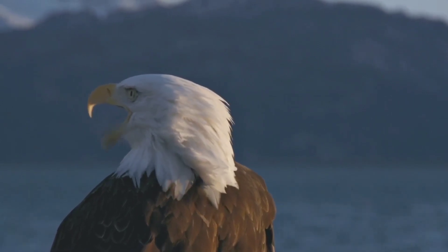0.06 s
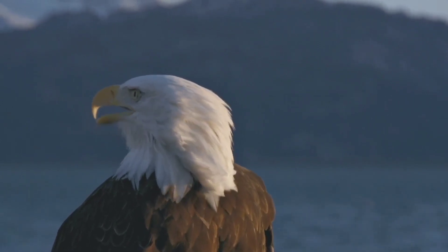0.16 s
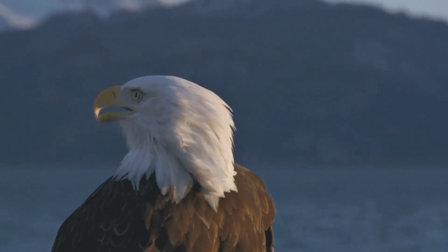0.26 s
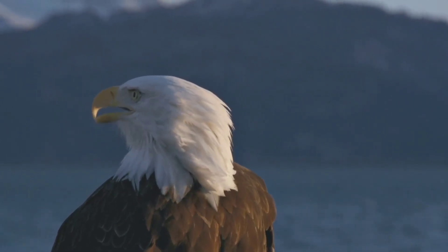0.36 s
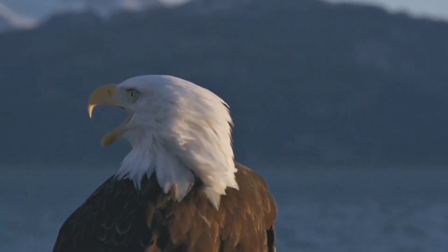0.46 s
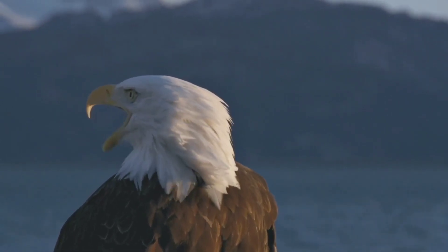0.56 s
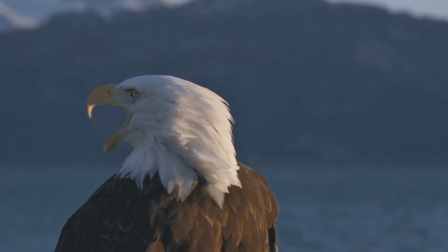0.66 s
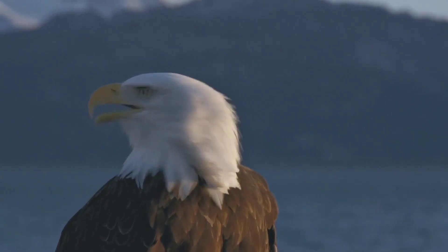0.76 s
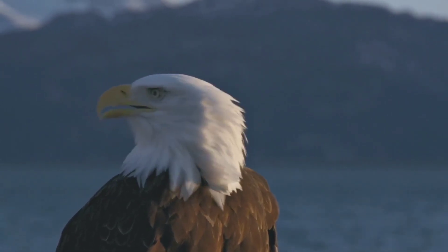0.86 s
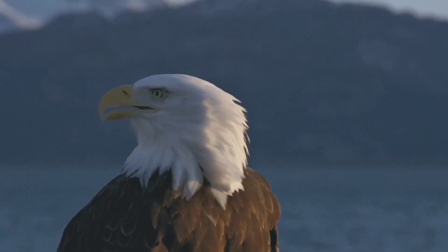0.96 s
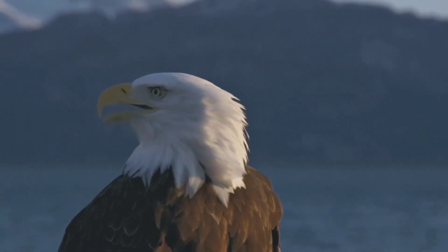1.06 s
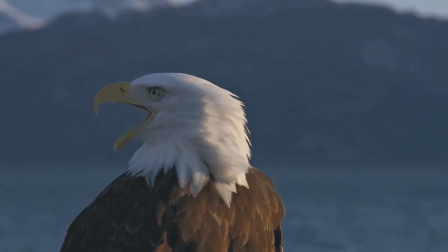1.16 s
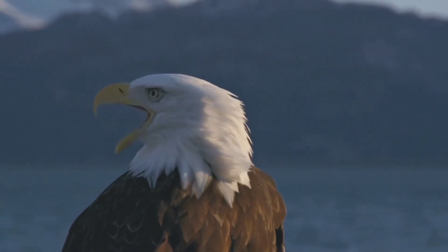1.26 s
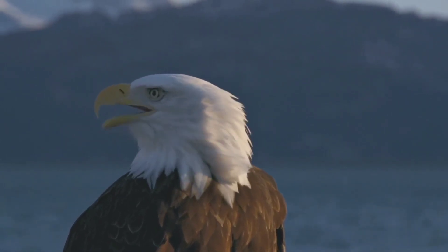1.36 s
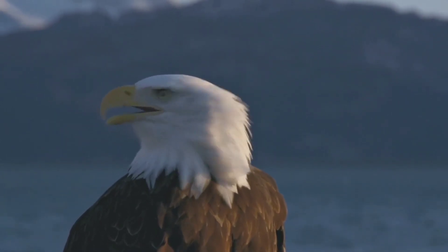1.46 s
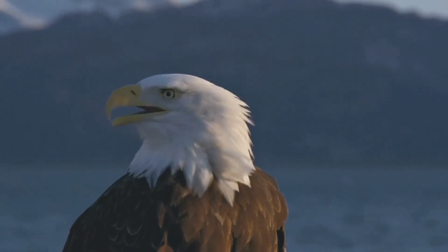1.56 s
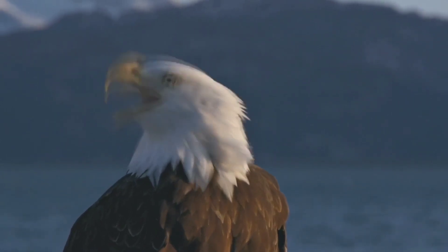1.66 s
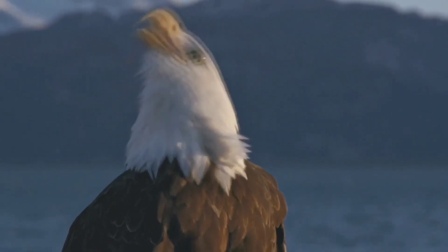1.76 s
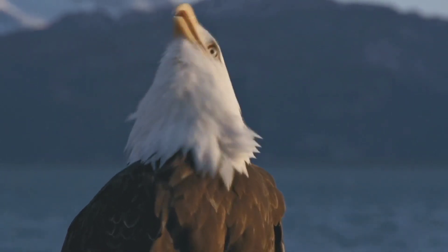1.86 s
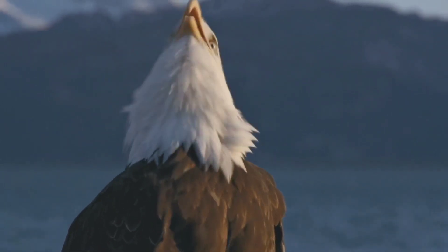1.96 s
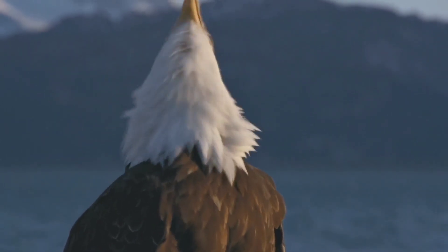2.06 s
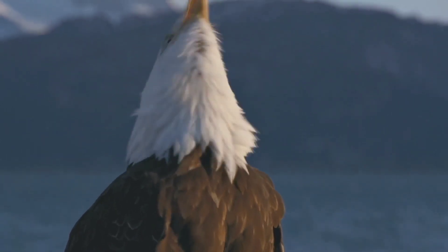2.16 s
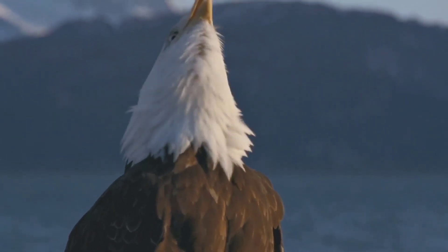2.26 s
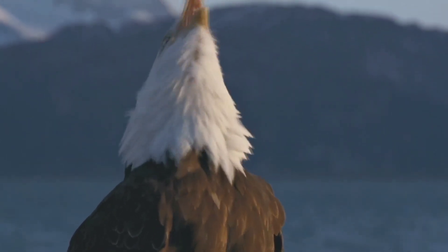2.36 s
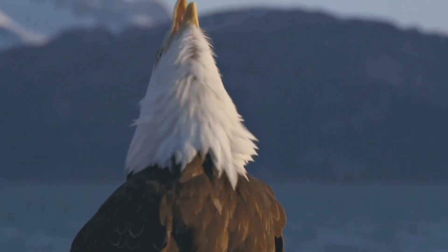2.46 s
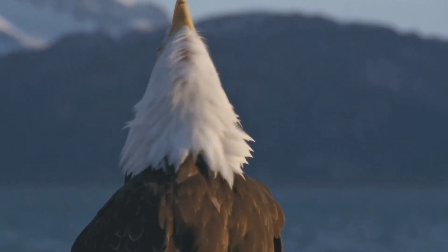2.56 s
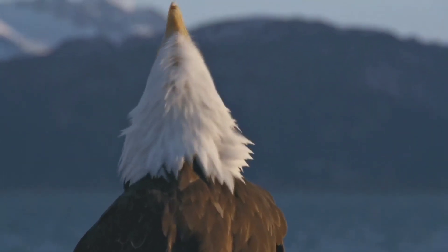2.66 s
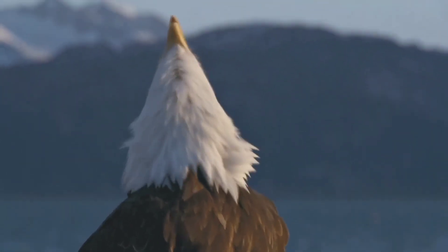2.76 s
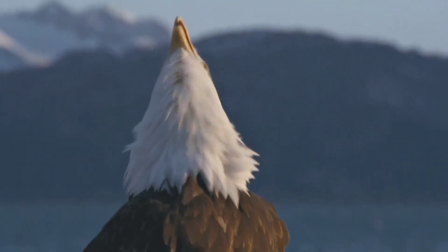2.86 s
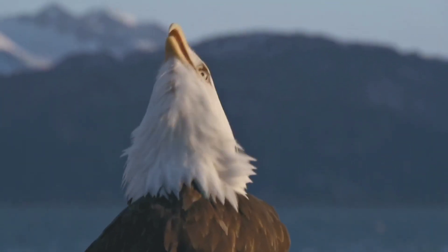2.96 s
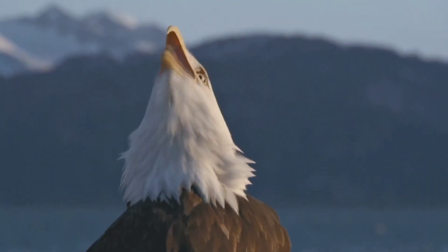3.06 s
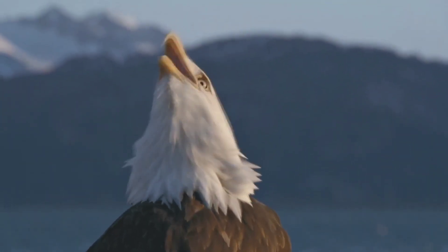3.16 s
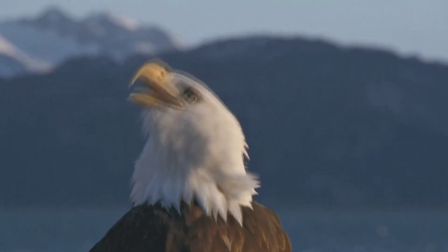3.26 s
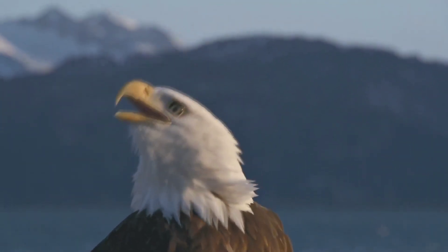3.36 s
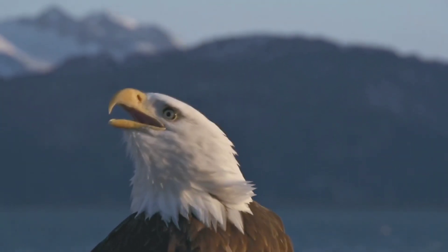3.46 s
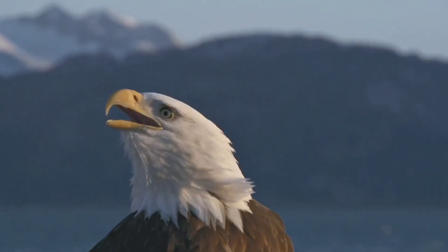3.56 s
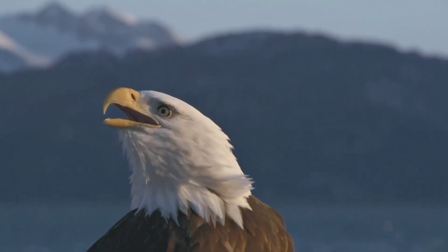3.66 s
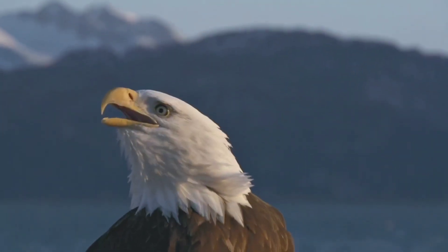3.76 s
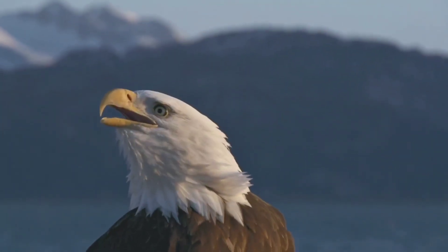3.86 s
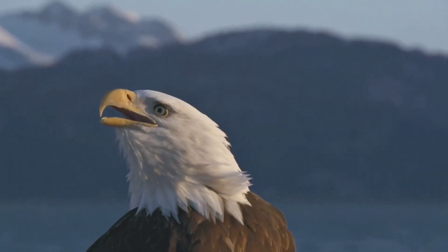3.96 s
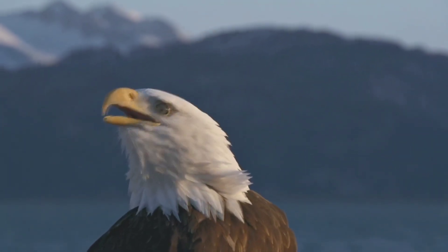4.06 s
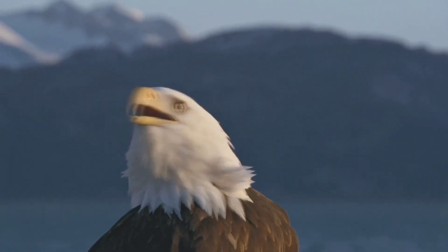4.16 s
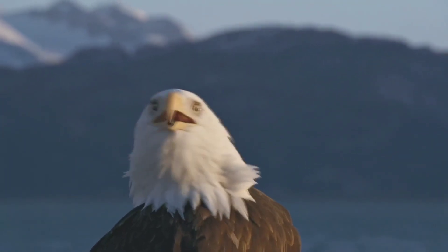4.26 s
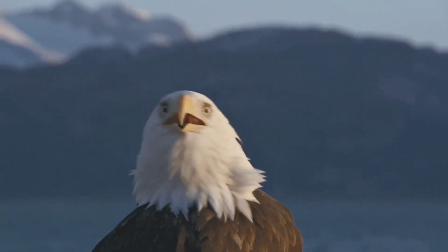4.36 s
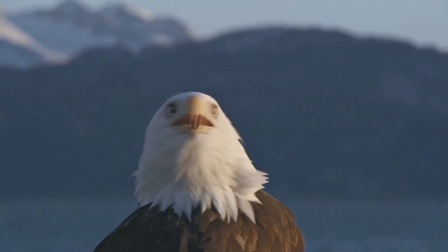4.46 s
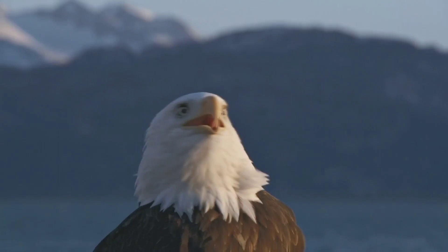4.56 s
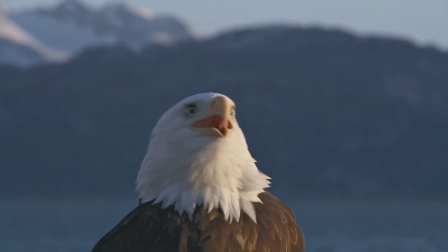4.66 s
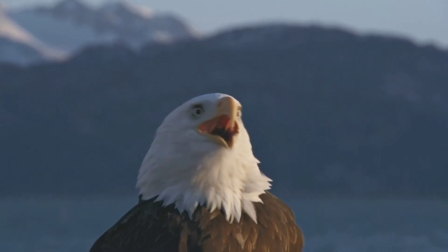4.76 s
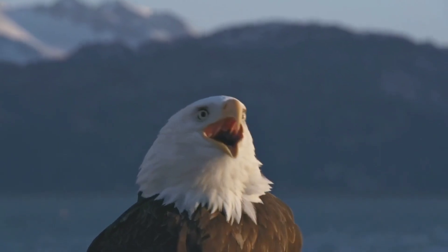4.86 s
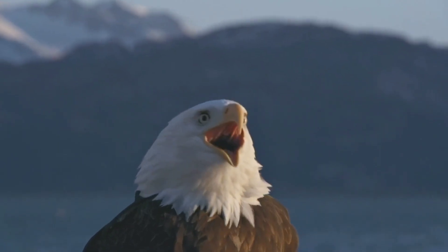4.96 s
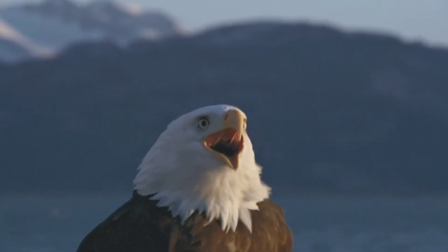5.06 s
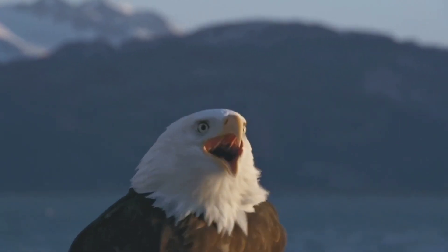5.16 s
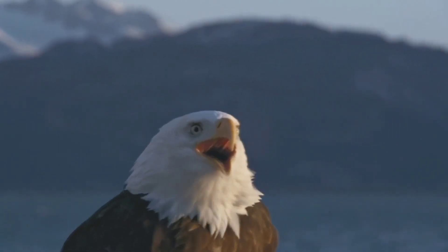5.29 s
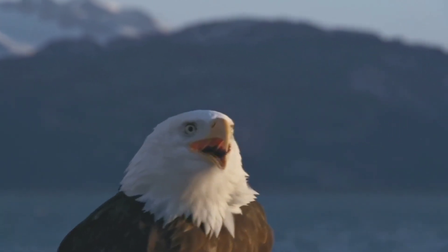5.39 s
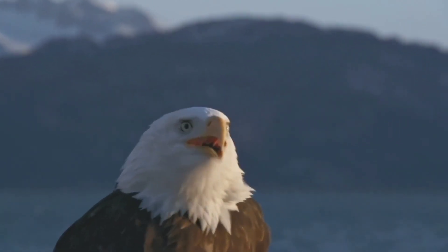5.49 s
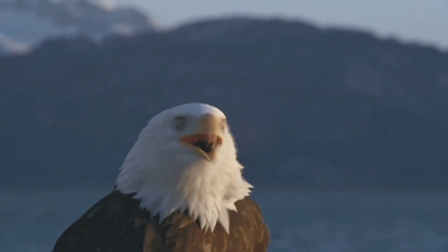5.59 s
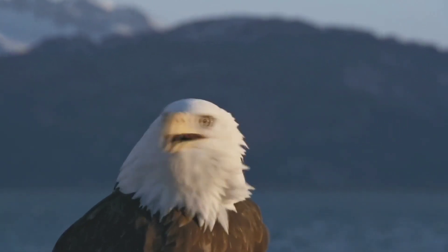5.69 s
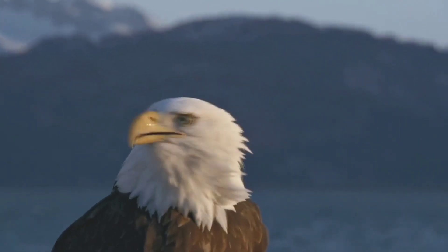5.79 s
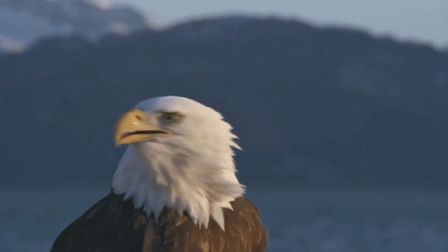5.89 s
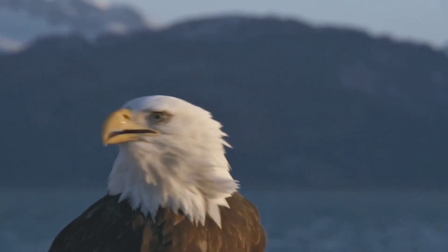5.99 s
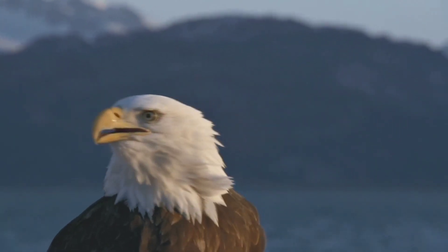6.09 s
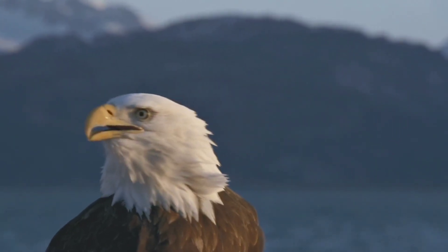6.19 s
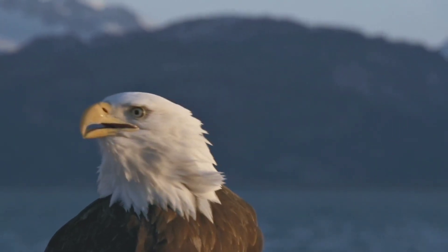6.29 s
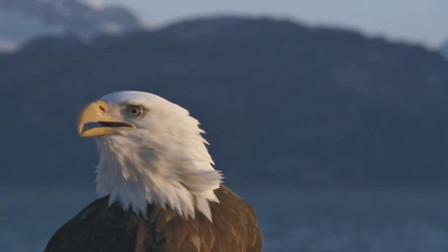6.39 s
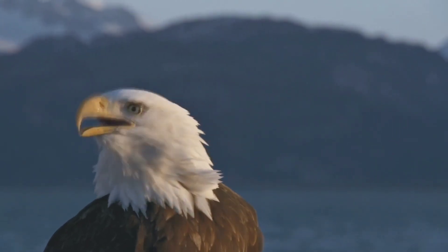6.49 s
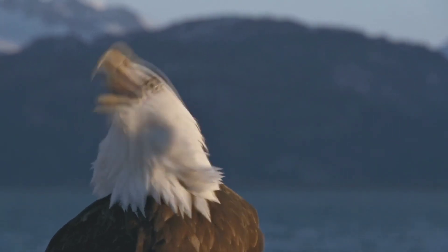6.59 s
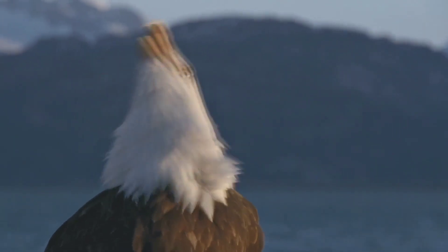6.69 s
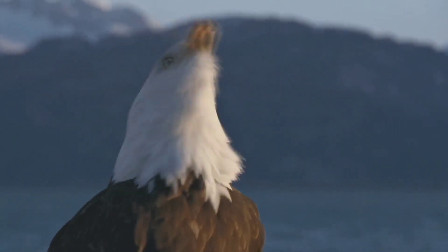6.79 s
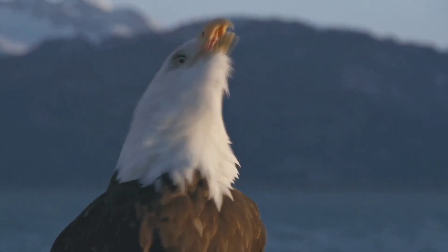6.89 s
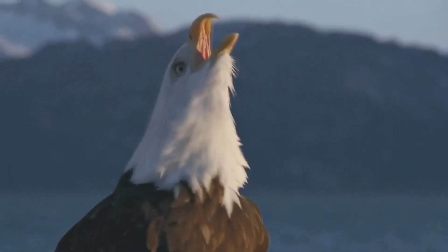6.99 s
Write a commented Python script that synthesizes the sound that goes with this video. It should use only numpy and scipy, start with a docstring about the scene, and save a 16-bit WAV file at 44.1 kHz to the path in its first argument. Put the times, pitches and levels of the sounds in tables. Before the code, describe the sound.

A bald eagle calls near the microphone on an open shore, with soft breeze, low wind rumble and distant water throughout. It is already whistling at 0 s; a loud, nearly pure high note ends around 0.1 s. Two joined piping notes, stepping upward, follow at 0.4-0.7 s, and a stronger whistle with a squeaky onset at 1.1-1.3 s. A hoarse squeak and throat rattle at 1.65-1.8 s lead into yelps near 2.0, 2.35, 2.7 and 3.07 s, each flipping sharply upward, then trailing into rasp and dry clicks until about 3.3 s. Only wind and water remain until 5.0 s, when a short arching scream cracks into bright, rough squeaks through 5.3 s. Crisp falling pips sound at 5.42 and 5.56 s. After another quiet second, rasping yelps return at 6.6 and 6.9 s, with small clicks near the end at 7 s. Faint echoes linger after the calls.

```python
"""An eagle calls on an open shore: piping whistles, short yelps that break upward in pitch, two falling pips.
Its syrinx gives nearly pure tones with weak overtones; squeaks and an arching scream are made the same way.
Hoarse rasps are noise-modulated tones over hiss, and dry rattles are clicks ringing the throat resonances.
A ground bounce and long scatter make the calls linger; shaped noise gives soft wind and distant water."""
import sys
import numpy as np
from scipy import signal
from scipy.fft import rfft, irfft, next_fast_len
from scipy.io import wavfile

SR = 44100
rng = np.random.default_rng(int(sys.argv[2]) if len(sys.argv) > 2 else 0)


def store_pcm(level_fs):
    """Save levels as 16-bit WAV."""
    pcm = np.round(np.clip(level_fs, -1, 1) * 32767).astype(np.int16)
    wavfile.write(sys.argv[1], SR, np.atleast_2d(pcm).T)


N = 310023
LEAD = SR // 4
TIME = np.arange(-LEAD, N) / SR  # seconds; the bird is already calling when the scene opens
CUTOFF_HZ = 11800

# Noise spectra, relative power density: frequency_hz, density_db (per Hz)
# Wind and far water
SHORE_SPECTRUM = [(15, -36), (25, -9), (54, 6), (90, -0.5), (123, 1), (147, -6.5), (295, -5), (671, -15),
                  (804, -16.5), (1930, -24.5), (3660, -36), (4060, -34), (5250, -45), (9730, -51),
                  (11600, -65.5), (15100, -89), (22000, -120)]
# Wind rumble on the microphone
RUMBLE_SPECTRUM = [(20, -19), (40, -9.5), (60, -1), (90, -7), (120, -6.5), (180, -10.5), (400, -64.5)]
# Air rushing through the sounding syrinx
AIR_SPECTRUM = [(600, -22), (1500, -1.5), (2000, -1), (2900, 0), (3800, -3.5), (4700, 2), (6200, -1),
                (7500, -8), (9300, -8), (10500, -14.5), (12000, -30.5)]
# Hiss of the rasps, shaped by the throat
HISS_SPECTRUM = [(300, -18.5), (1000, -16), (1400, 9), (1900, -5.5), (2900, 5), (4500, 4), (6000, -12.5),
                 (7500, -8), (9000, -15), (11000, -27.5), (12500, -42.5)]
# Colour of the far echoes: frequency_hz, level_db
ECHO_SPECTRUM = [(500, -8.5), (2450, 1), (3100, -3.5), (4000, -10), (4900, -1), (6200, 2), (9500, -3),
                 (12000, -7)]

# The breeze, before an overall trim: time_s, level_db
BREEZE = [(0.0, -55.5), (0.29, -56), (0.98, -53), (2.08, -54.5), (2.6, -52), (3.43, -57), (4.05, -56.5),
          (4.76, -52.5), (5.07, -51), (5.31, -55.5), (5.85, -57.5), (7.03, -54.5)]
# The wind rumble, before an overall trim: time_s, level_db
RUMBLE = [(0, -57.5), (.4, -52), (1.2, -53), (2.1, -48.5), (2.4, -55), (3.7, -56.5), (4.5, -55.5),
          (4.8, -60), (5.15, -55), (5.6, -64), (6.2, -59), (7.03, -49.5)]
GUSTS_HZ, GUST_DB = 5.1, 1  # the rumble comes in lumps

# Piping notes: start_s, length_s, pitch_hz, climb_hz, level_db, fade_db, octave_overtone_db,
# overtone_fall_db (first step; later steps grow), roughness (0-1), last_push_s, push_level_change_db
WHISTLES = [(-.23, 0.22, 2410, 4.3, -25, -1, -19.5, -13, .02, -.11, 1.5),
            (-.07, 0.17, 2979, 82, -15.5, 3.5, -18.5, -21, 0.01, .063, 0),
            (0.401, 0.053, 1278, 263, -45.5, 1, -15, -21.5, 0.2, .43, 0),
            (.436, 0.11, 2440, 4, -21.5, -1.5, -14.5, -15, 0.05, .528, -3),
            (0.543, 0.16, 2954, 104, -19.5, -4, -21, -20.5, 0.03, .677, -2),
            (0.558, 0.12, 1480, 50, -57.5, 2.5, -23.5, -20.5, 0.2, .67, -0.5),
            (1.09, 0.038, 1380, 160, -52, -0.5, -15.5, -20.5, 0.3, 1.12, -0.5),
            (1.116, .086, 3683, 190, -36, -8.5, -19.5, -32.5, .13, 1.195, -1.5),
            (1.128, 0.068, 3040, 38, -44, -12, -21.5, -19, 0.14, 1.19, 6.5),
            (1.184, .143, 3061, 83, -12.5, 4.5, -27, -13, .025, 1.29, -3)]
ATTACK_S, RELEASE_S, EDGE_DB = .009, 0.027, 22.5  # opening and closing times, and their level range
PUSH_S, PUSH_LIFT, PUSH_OCTAVE_DB = 0.021, .025, 10  # a push of air lifts (share of pitch) and brightens
WAVER_HZ, WAVER = 44.57, .07  # slow waver, share of pitch per unit of roughness
RELEASE_SAG, RELEASE_OCTAVE_DB = 0.061, -1  # closing lowers the pitch (share) and the overtones
RELEASE_SHUDDER_DB, SHUDDER_HZ = 3, 130  # and shakes the strength

# The head turns and aims more or less of the call at the far slopes: time_s, level_db
AIM = [(0, 2), (.65, 3), (1.3, -2), (3.1, -8), (5.4, -19.5), (6.6, -9.5)]

# Short gliding squeaks, alone or within other calls: peak_s, length_s, pitch_hz,
# glide (log pitch ratio), level_db, octave_overtone_db, roughness (0-1)
SQUEAKS = [(0.531, 0.033, 2527, .02, -26.5, -3.5, .06), (1.13, 0.018, 3620, -.06, -36, -14.5, .1),
           (1.657, 0.021, 3540, 0.25, -38, 1, .1), (1.665, 0.016, 4450, 0.18, -33, -3.5, .1),
           (1.679, .016, 3044, -.1, -28.5, -27, .38), (2.381, .04, 4400, -.04, -26.5, -35.5, .12),
           (3.125, .04, 4650, -.27, -31, -33, .22), (5.098, .014, 5330, .35, -28, -21, .2),
           (5.127, .013, 4900, -.36, -12, -30.5, .25), (5.179, .012, 3825, -.1, -22, -29, 0.1),
           (5.012, 0.015, 2762, 0.097, -40.5, -21, .2), (5.2685, .02, 3192, 0, -6, -16, .06),
           (5.263, 0.009, 3033, -0.012, -15.5, -25, 0), (5.265, .021, 3763, .02, -14, -21.5, .1),
           (5.278, .02, 4860, -.02, -17.5, -38, .1), (5.306, .016, 3830, -.08, -26, -19.5, .2),
           (6.582, .019, 3500, .1, -25, -12, .06), (6.71, .05, 4900, -.35, -32.5, -44.5, .17),
           (6.941, 0.034, 4560, -0.082, -29.5, -29, 0), (6.958, 0.033, 4480, -0.066, -30.5, -40, 0.2),
           (2.68, .012, 3323, .05, -24, -18.5, .1), (3.073, 0.013, 4616, .05, -30.5, -30.5, 0),
           (6.664, 0.044, 3913, 0.27, -38, -32, 0.3)]
SQUEAK_EDGE_DB, SQUEAK_ROUNDNESS, SQUEAK_FALL_DB = 28, 1.1, -35

# Hoarse stretches: start_s, rise_s, fall_s, crest_hz, end_hz, squeal_db, hiss_db, fade_db,
# side_db (extra level of the separate rasp noise in the sides)
RASPS = [(1.656, 0.0037, 0.02, 3470, 3150, -49, -33.5, 20, -7),
         (1.68, 0.1, 0.038, 4900, 3000, -39.5, -43, 17, -5),
         (1.986, .018, 0.14, 3770, 3250, -40, -45, 6, -47),
         (2.33, 0.06, 0.073, 4416, 3150, -41.5, -42, 4.5, -10),
         (2.671, 0.027, 0.026, 5400, 7300, -34, -48, 16, -4.5),
         (2.692, 0.061, .06, 4800, 3200, -41.5, -41.5, 9.5, -3.5),
         (3.05, 0.0075, 0.025, 3400, 4560, -32.5, -53, 3, -7.5),
         (3.051, 0.031, 0.024, 7200, 7000, -39.5, -61, 11.5, 3.5),
         (3.08, 0.031, 0.059, 5200, 2980, -39, -43.5, 2, -9.5),
         (5.01, 0.035, 0.055, 4650, 5000, -51, -50.5, 3.5, -27.5),
         (5.097, .013, .022, 7400, 6800, -38.5, -47, 0.5, -16.5),
         (5.116, 0.017, .022, 5604, 5700, -24.5, -35, 15.5, -15.5),
         (5.135, .018, 0.031, 5800, 5640, -29, -51, 5, -3.5),
         (5.173, .005, .014, 5300, 5100, -26, -51.5, 12, -1),
         (5.18, 0.0045, .04, 5300, 5070, -53, -55, 16, -0.5),
         (5.253, 0.011, 0.028, 4590, 4980, -27.5, -46.5, 14, -17),
         (5.282, 0.0073, 0.011, 5800, 5330, -24.5, -49.5, 14.5, -1.5),
         (5.302, .005, 0.017, 5250, 4890, -26, -50, 21.5, -2),
         (5.407, 0.013, 0.035, 4530, 4500, -45.5, -46.5, 29.5, -28),
         (5.553, 0.012, 0.017, 4500, 4560, -62.5, -47, 13, -5.5),
         (5.562, .017, 0.051, 5660, 5700, -40, -62.5, 36, 1),
         (6.573, 0.054, 0.05, 4295, 4500, -34.5, -46, 9.5, -16.5),
         (6.665, 0.032, 0.047, 5050, 2825, -38, -43, 3, -18),
         (6.883, 0.083, 0.061, 4500, 3500, -49, -44.5, 8, -8)]
RASP_SCOOP, RASP_RISE_S = .28, .04  # before the crest the pitch is flat by up to this share
SQUEAL_SWELL_DB, HISS_SWELL_DB = 9.5, 13.5  # and the sound is weaker by up to this
RASP_RELEASE_S, RASP_SINK_POWER = 0.0076, 1.5

# Hard snaps as the throat opens or shuts, before an overall trim: time_s, level_db
SNAPS = [(1.799, -26), (2.121, -29), (2.462, -23), (3.239, -33.5), (5.1274, -26.5), (5.258, -29),
         (5.418, -45.5), (5.5598, -39.5)]
# Runs of the throat rattle, before an overall trim: start_s, length_s, click_rate_hz, level_db, fade_db
RATTLES = [(1.687, 0.054, 83.5, -32.5, 6), (2.044, 0.023, 89, -32, -4.5), (2.0844, .06, 67, -30, 1.5),
           (2.408, 0.06, 63, -35.5, -9), (2.458, .015, 200, -32, -3.5), (2.782, 0.022, 260, -33, -4.5),
           (3.149, .022, 215, -28.5, -3.5), (3.179, .045, 49.8, -40, 5), (3.279, 0.031, 38, -45, 1),
           (6.717, 0.031, 82, -39, -10), (7.0032, 0.015, 225, -37.5, -7.5)]
RATTLE_JITTER, RATTLE_UNEVEN_DB = 0.017, 4.5  # spread of timing (share of the gap) and of level
# Throat resonances struck by the clicks: frequency_hz, width_hz, level_db
THROAT = [(430, 120, -6.5), (834.6, 300, -11.5), (1338, 190, -0.5), (2011, 520, -6), (2730, 750, -13.5),
          (3710, 730, -22.5)]

# Very short falling chirps: centre_s, pitch_hz (at the centre), level_db
CHIRPS = [(1.739, 3600, -28.5), (2.078, 4000, -33), (2.0925, 4300, -28), (2.108, 3855, -26.5),
          (2.12, 3664, -38), (2.44, 3196, -30), (6.729, 3000, -41.5), (7.003, 2825, -31)]

# Yelps: low_peak_s, jump_s (low to upper register), low_pitch_hz, upper_pitch_hz, low_db, flip_db,
# upper_db, octave_overtone_db (flip and upper register), roughness (0-1)
YELPS = [(2.0016, .016, 2970, 3803, -26, -22.5, -15, -15.5, 0.06),
         (2.347, 0.017, 2900, 3710, -15.5, -28.5, -16, -16.5, 0.11),
         (2.687, 0.014, 2858, 3600, -12.5, -37, -10.5, -29.5, 0.1),
         (3.065, 0.016, 2870, 3676, -10.5, -28.5, -9, -22, 0.02),
         (6.583, .0175, 2850, 3714, -31.5, -19, -8.5, -19, .06),
         (6.901, .018, 2903, 3740, -22.5, -32, -19, -17.5, 0.19)]
LOW_S, FLIP_S, UPPER_S = 0.025, 0.015, .022  # length of each register
YELP_GLIDE, FLIP_GLIDE = 0.087, .22  # rise as log pitch ratio; the flip is steeper
FLIP_HZ, LOW_OCTAVE_DB = 4396, -8.5  # the low register is purer

# One arching scream: time_s, pitch_hz, level_db, octave_overtone_db
SCREAM = [(5.011, 3290, -45.5, -7), (5.017, 3380, -23, 0), (5.026, 3830, -31, 3.5), (5.031, 4490, -17, -21),
          (5.037, 5150, -23, -32), (5.052, 5610, -24, -23.5), (5.07, 5060, -27, -28),
          (5.081, 4400, -27, -4.5), (5.093, 3680, -34.5, 0)]
# The other half of the syrinx beneath the scream: start_s, length_s, pitch_hz, sink_hz, level_db
UNDERTONES = [(5.035, .06, 4945, 1429, -24), (5.036, 0.061, 4100, 950, -34)]
UNDERTONE_FADE_DB, UNDERTONE_OCTAVE_DB, UNDERTONE_FALL_DB, UNDERTONE_ROUGH = 4, -41.5, -14.5, 0.11

# Falling pips: start_s, length_s, pitch_hz, level_db, octave_overtone_db, roughness (0-1)
PIPS = [(5.42, 0.048, 2967, -13, -16.5, 0.05), (5.564, 0.048, 2903, -13, -20, 0)]
PIP_ATTACK_S, PIP_FADE_DB, PIP_FALL_DB = 0.0029, 7.5, -25
PIP_DROP = 0.088  # share of the pitch


def from_db(db):
    """Amplitude ratio from its logarithmic measure in decibels."""
    return 10 ** (np.asarray(db) / 20)


def rms_one(x):
    """Normalisation to unit mean power."""
    return x / np.sqrt(np.mean(x ** 2) + 1e-20)


def play(rows):
    """Linear interpolation of control points: the stretch of time covered, and each column by sample."""
    s, *columns = np.transpose(rows)
    s = np.sort(s)
    span = slice(*np.searchsorted(TIME, [s[0], s[-1] + 1 / SR]))
    return span, [np.interp(TIME[span], s, c) for c in columns]


def noise(spectrum, size=len(TIME)):
    """Spectral shaping: white noise weighted by frequency, at unit power."""
    hz, db = np.transpose(spectrum)
    padded = next_fast_len(size)
    bins = np.maximum(np.fft.rfftfreq(padded, 1 / SR), 1)
    gain = from_db(np.interp(np.log(bins), np.log(hz), db))
    white = rng.standard_normal(padded)
    return rms_one(irfft(rfft(white) * gain, padded)[:size])


def lowpass(x, order, hz):
    """Low-pass filtering with a maximally flat passband."""
    return signal.sosfilt(signal.butter(order, hz, fs=SR, output="sos"), x)


def wander(hz):
    """Random modulation: low-passed noise of spread 1."""
    return rms_one(lowpass(rng.standard_normal(len(TIME)), 2, hz))


def resonance(x, hz, width_hz):
    """Two-pole resonance with gain 1 at its peak."""
    r = np.exp(-np.pi * width_hz / SR)
    zeros = np.array([1, 0, -1]) * (1 - r * r) / 2
    poles = [1, -2 * r * np.cos(2 * np.pi * hz / SR), r * r]
    return signal.lfilter(zeros, poles, x)


def shore(level_db, hiss_db, hiss_growth, rumble_db):
    """Turbulence noise of wind and far water: hiss swells faster than the low wash as the breeze rises."""
    breeze_db = np.interp(TIME, *np.transpose(BREEZE))
    rise_db = breeze_db - np.median(breeze_db)
    gust_db = np.interp(TIME, *np.transpose(RUMBLE)) + GUST_DB * wander(GUSTS_HZ)
    wash_band = signal.butter(2, [130, 1500], "band", fs=SR, output="sos")
    hiss_band = signal.butter(2, 1500, "high", fs=SR, output="sos")
    wash = signal.sosfilt(wash_band, noise(SHORE_SPECTRUM))
    hiss = signal.sosfilt(hiss_band, noise(SHORE_SPECTRUM))
    swell = from_db(hiss_db + hiss_growth * rise_db)
    breeze = from_db(breeze_db + level_db) * (wash + swell * hiss)
    return breeze + from_db(gust_db + rumble_db) * noise(RUMBLE_SPECTRUM)


def course(length_s, attack_s, release_s):
    """Note envelope in steps: share of length gone, and how far it is still opening or closing (0-1)."""
    gone = np.linspace(0, 1, 101)
    opening = np.clip(1 - gone * length_s / attack_s, 0, 1)
    closing = np.clip(1 - (1 - gone) * length_s / release_s, 0, 1)
    return gone, opening, closing


def whistle(s, length_s, hz, climb_hz, level_db, fade_db, octave_db, fall_db, rough, push_s, push_db):
    """Air pressure governs a held note: it creeps up, is pushed higher and brighter, and sags as it closes."""
    gone, opening, closing = course(length_s, ATTACK_S, RELEASE_S)
    when = s + length_s * gone
    push = np.exp(-((when - push_s) / PUSH_S) ** 2)
    waver = WAVER * rough * np.interp(when, TIME, wander(WAVER_HZ))
    pitch = (hz + climb_hz * gone) * (1 + waver + PUSH_LIFT * push - RELEASE_SAG * closing)
    level = level_db - fade_db * gone + push_db * push - EDGE_DB * (opening + closing ** 2)
    level += RELEASE_SHUDDER_DB * closing * np.interp(when, TIME, wander(SHUDDER_HZ))
    octave = octave_db + PUSH_OCTAVE_DB * push + RELEASE_OCTAVE_DB * closing
    return fall_db, rough, np.transpose([when, pitch, level, octave])


def syrinx(notes, jitter, shimmer, overtone_flutter_db, air_db):
    """Harmonic oscillation with weak overtones; roughness shakes pitch and strength and lets more air through."""
    out = np.zeros(len(TIME))
    shake, tremble = wander(500), wander(900)
    flutter = [wander(30) for k in range(3)]
    air = noise(AIR_SPECTRUM)
    for fall_db, rough, rows in notes:
        span, (hz, level_db, octave_db) = play(rows)
        phase = 2 * np.pi * np.cumsum(hz * (1 + jitter * rough * shake[span])) / SR
        breath = from_db(air_db + octave_db / 2) * np.sqrt(abs(rough)) * air[span]
        tone = np.sin(phase) + breath
        for k, slow in enumerate(flutter):
            overtone_db = octave_db + fall_db * k * (k + 1) / 2
            overtone_db = overtone_db + overtone_flutter_db * np.tanh(slow[span])
            tone += from_db(overtone_db) * np.sin((k + 2) * phase)
        # Short tapers keep the ends from clicking
        edges = signal.windows.tukey(len(tone), min(1, 130 / max(len(tone), 1)))
        strength = from_db(level_db) * np.sqrt(2) * (1 + shimmer * rough * tremble[span])
        out[span] += strength * tone * edges
    return out


def landscape(x, ground_s, ground_db, far_db, t60):
    """Reflection and reverberation: a quick ground bounce, then long faint scatter from trees and slopes."""
    age = np.arange(2 * SR) / SR
    scatter = noise(ECHO_SPECTRUM, size=len(age)) * from_db(-60 * age / t60)
    scatter /= np.sqrt(np.sum(scatter ** 2))
    ground = np.interp(TIME - ground_s, TIME, x)
    aimed = x * from_db(np.interp(TIME, *np.transpose(AIM)))
    far = signal.fftconvolve(aimed, scatter)[:len(x)]
    return from_db(ground_db) * ground + from_db(far_db) * far


def squeak(s, length_s, hz, glide, level_db, octave_db, rough):
    """Exponential frequency glide under an envelope that swells and dies evenly about its peak."""
    off = np.linspace(-.5, .5, 41)
    level = level_db - SQUEAK_EDGE_DB * abs(2 * off) ** SQUEAK_ROUNDNESS
    rows = [s + length_s * off, hz * np.exp(glide * off), level, np.full_like(off, octave_db)]
    return SQUEAK_FALL_DB, rough, np.transpose(rows)


def rasp_course(s, rise_s, fall_s, crest_hz, end_hz, squeal_db, hiss_db, fade_db):
    """Joint pitch and strength contour, up to a crest and down: rows of time_s, pitch_hz, squeal_db, hiss_db."""
    gone, _, closing = course(rise_s + fall_s, ATTACK_S, RASP_RELEASE_S)
    past = gone * (rise_s + fall_s) - rise_s  # seconds past the crest
    slack = 1 - np.exp(-(np.minimum(past, 0) / RASP_RISE_S) ** 2)
    sunk = np.maximum(past, 0) / fall_s
    hz = crest_hz * (1 - RASP_SCOOP * slack) + (end_hz - crest_hz) * sunk ** RASP_SINK_POWER
    loss_db = fade_db * sunk + EDGE_DB * closing ** 2
    squeal = squeal_db - SQUEAL_SWELL_DB * slack - loss_db
    hiss = hiss_db - HISS_SWELL_DB * slack - loss_db
    return np.transpose([s + rise_s + past, hz, squeal, hiss])


def rasp(squeal_width_hz, skirt_width_hz, skirt_share, grain_db, sideways):
    """Breakdown of oscillation: the tone becomes a noisy gliding squeal over a grainy, throat-shaped hiss."""
    out = np.zeros(len(TIME))
    hiss = noise(HISS_SPECTRUM)
    grain = rms_one(from_db(grain_db * wander(370)))
    # Two random modulators in quadrature spread the squeal into a band about its pitch
    sway = [rms_one(wander(squeal_width_hz) + skirt_share * wander(skirt_width_hz)) for k in range(2)]
    for *shape, side_db in RASPS:
        span, (hz, squeal_db, hiss_db) = play(rasp_course(*shape))
        phase = 2 * np.pi * np.cumsum(hz) / SR
        squeal = sway[0][span] * np.cos(phase) + sway[1][span] * np.sin(phase)
        opening = 1 - np.exp(-np.arange(len(hz)) / (0.0065 * SR))
        hoarse = from_db(squeal_db) * squeal + from_db(hiss_db) * hiss[span]
        out[span] += from_db(side_db * sideways) * opening * hoarse
    return out * grain


def slaps():
    """Impulse timing: every snap and the slightly uneven clicks of every run, as rows of time_s, level_db."""
    rows = list(SNAPS)
    chance = rng.standard_normal(size=(len(RATTLES), 16, 2))
    for (s, length_s, per_s, level_db, fade_db), draws in zip(RATTLES, chance):
        for age, (late, strong) in zip(np.arange(0, length_s, 1 / per_s), draws):
            when = s + age + RATTLE_JITTER * late / per_s
            rows.append((when, level_db - fade_db * age / length_s + RATTLE_UNEVEN_DB * strong))
    return rows


def rattle(level_db, spread_db, soft_hz, crackle_db, crackle_s):
    """Impulse excitation of resonances: membrane slaps, each with its own colour and a brief crackle after."""
    s, click_db = np.transpose(slaps())
    colours = rng.standard_normal((len(s), len(THROAT)))
    out = np.zeros(len(TIME))
    keep = np.exp(-1 / (crackle_s * SR))
    # On average 2000 random impulses per second, of either sign
    sparks = (rng.random(len(TIME)) < 2000 / SR) * np.sign(rng.standard_normal(len(TIME)))
    for k, (hz, width_hz, mode_db) in enumerate(THROAT):
        clicks = np.full(len(TIME), 1e-18)
        struck = np.searchsorted(TIME[:-1], s)
        clicks[struck] = from_db(click_db + level_db + mode_db + spread_db * colours[:, k])
        decay = signal.lfilter([1], [1, -keep], clicks)
        clicks += from_db(crackle_db) * sparks * decay
        out += resonance(clicks, hz, width_hz)
    return lowpass(out, 4, soft_hz)


def chirps(length_s, fall_per_s):
    """Frequency sweep under a bell-shaped envelope: each chirp lasts milliseconds while its pitch drops."""
    out = np.zeros(len(TIME))
    age = np.arange(-SR // 100, SR // 100) / SR
    swell = np.exp(-(age / length_s) ** 2)
    for s, hz, level_db in CHIRPS:
        phase = 2 * np.pi * np.cumsum(hz * np.exp(-fall_per_s * age)) / SR
        start = min(np.searchsorted(TIME, s + age[0]), len(TIME) - len(age))
        out[start:start + len(age)] += from_db(level_db) * np.sqrt(2) * swell * np.sin(phase)
    return out


def yelp(s, jump_s, low_hz, upper_hz, low_db, flip_db, upper_db, octave_db, rough):
    """Register break: three rising squeaks in one call, from low register through flip to upper register."""
    return [squeak(s, LOW_S, low_hz, YELP_GLIDE, low_db, octave_db + LOW_OCTAVE_DB, rough),
            squeak(s + 0.51 * jump_s, FLIP_S, FLIP_HZ, FLIP_GLIDE, flip_db, octave_db, rough),
            squeak(s + jump_s, UPPER_S, upper_hz, YELP_GLIDE, upper_db, octave_db, rough)]


def undertone(s, length_s, hz, sink_hz, level_db):
    """Two-voiced sound: a second note that sinks ever faster beneath the scream."""
    gone, opening, closing = course(length_s, PIP_ATTACK_S, RASP_RELEASE_S)
    level = level_db - UNDERTONE_FADE_DB * gone - EDGE_DB * (opening + closing ** 2)
    octave = np.full_like(gone, UNDERTONE_OCTAVE_DB)
    rows = [s + length_s * gone, hz - sink_hz * gone ** 2, level, octave]
    return UNDERTONE_FALL_DB, UNDERTONE_ROUGH, np.transpose(rows)


def sharp_calls(scream_fall_db, scream_rough):
    """Superposition of voices: the notes of the yelps, the squeaks and the two-voiced scream."""
    notes = [note for row in YELPS for note in yelp(*row)]
    notes += [squeak(*row) for row in SQUEAKS]
    notes += [(scream_fall_db, scream_rough, SCREAM)]
    return notes + [undertone(*row) for row in UNDERTONES]


def pip(s, length_s, hz, level_db, octave_db, rough):
    """Sharp onset and decay: a quick start, a steady fade, and a pitch that drops away at the end."""
    gone, opening, closing = course(length_s, PIP_ATTACK_S, RELEASE_S)
    level = level_db - PIP_FADE_DB * gone - EDGE_DB * (opening + closing ** 3)
    pitch = hz * (1 - PIP_DROP * gone ** 4)
    rows = [s + length_s * gone, pitch, level, np.full_like(gone, octave_db)]
    return PIP_FALL_DB, rough, np.transpose(rows)


def scene():
    """Mid and side superposition: bird in the centre, with separate rasp noise at 3.8-8.5 kHz in the sides."""
    background = shore(level_db=4.5, hiss_db=1, hiss_growth=.5, rumble_db=-1.5)
    piping = [whistle(*row) for row in WHISTLES] + [pip(*row) for row in PIPS]
    sharp = sharp_calls(scream_fall_db=-38, scream_rough=.075)
    voice = syrinx(piping, jitter=0.041, shimmer=.3, overtone_flutter_db=8.5, air_db=-20)
    voice += syrinx(sharp, jitter=0.067, shimmer=0.46, overtone_flutter_db=6.0, air_db=-17.0)
    # Centre and sides draw their own noise
    hoarse, side_rasp = (rasp(squeal_width_hz=170, skirt_width_hz=920, skirt_share=0.71, grain_db=1.0,
                              sideways=way) for way in (False, True))
    bird = voice + hoarse + chirps(length_s=0.00091, fall_per_s=280)
    bird += rattle(level_db=29.5, spread_db=3.5, soft_hz=3250, crackle_db=-5.5, crackle_s=0.0039)
    mid = background + bird + landscape(bird, ground_s=0.01, ground_db=-17.0, far_db=-30, t60=1.3)
    side = signal.sosfilt(signal.butter(5, [3800, 8500], "band", fs=SR, output="sos"), side_rasp)
    return np.array([mid + side, mid - side])[:, LEAD:]


def record(dry):
    """Band limiting: an elliptic low-pass cuts the top steeply."""
    return signal.sosfilt(signal.ellip(10, .2, 70, CUTOFF_HZ, fs=SR, output="sos"), dry)


dry = scene()
out = record(dry)
store_pcm(out)
```